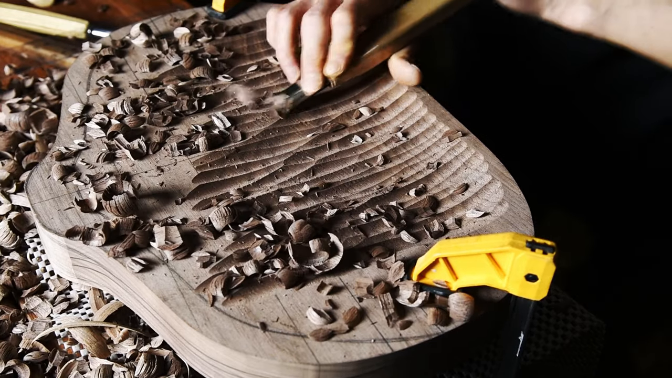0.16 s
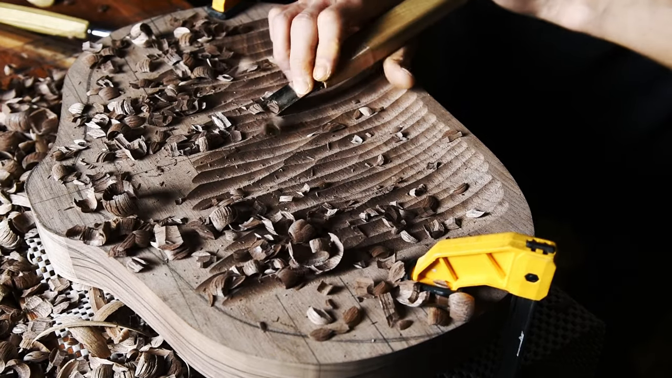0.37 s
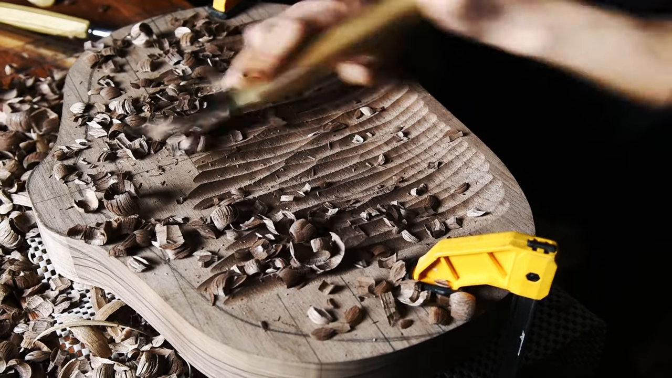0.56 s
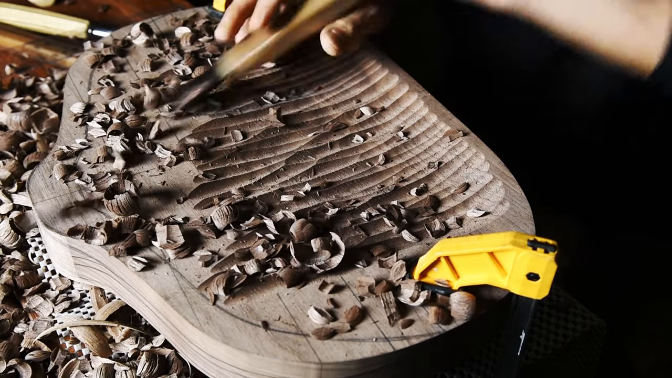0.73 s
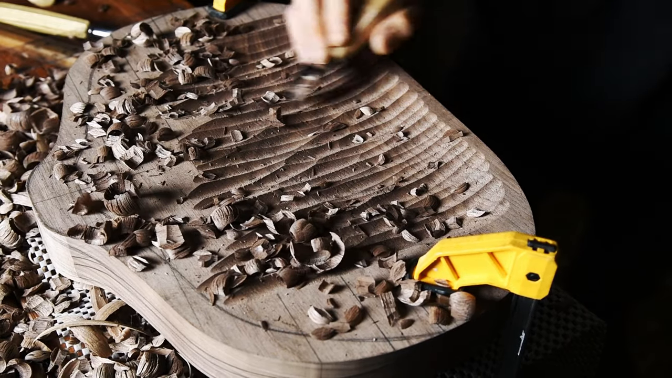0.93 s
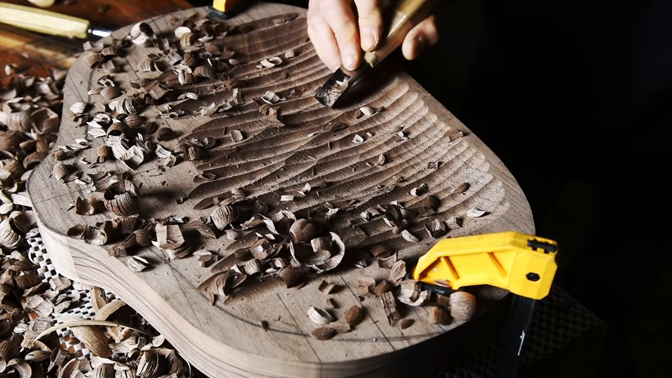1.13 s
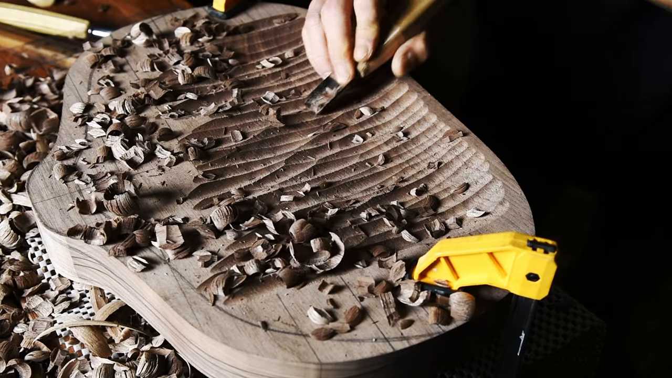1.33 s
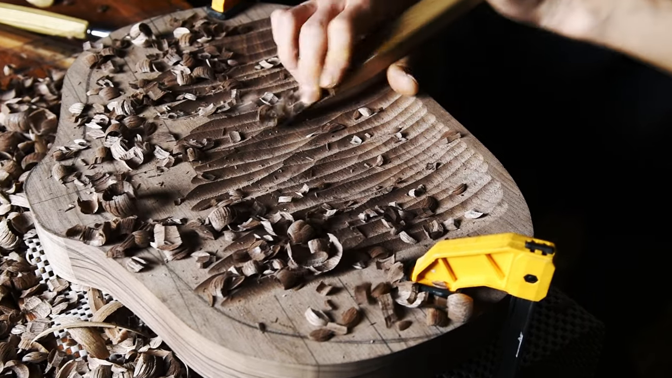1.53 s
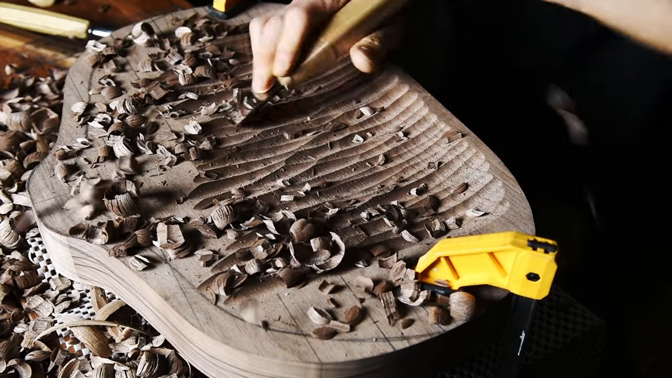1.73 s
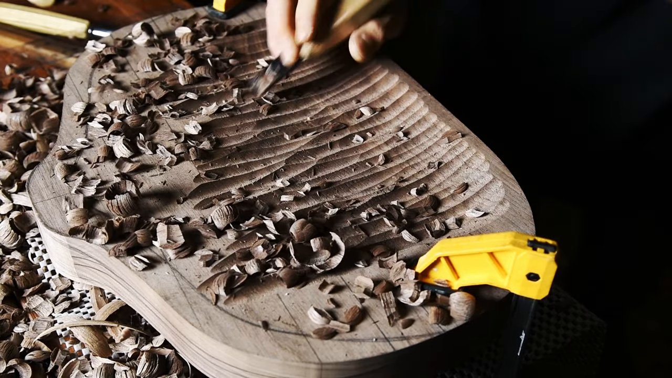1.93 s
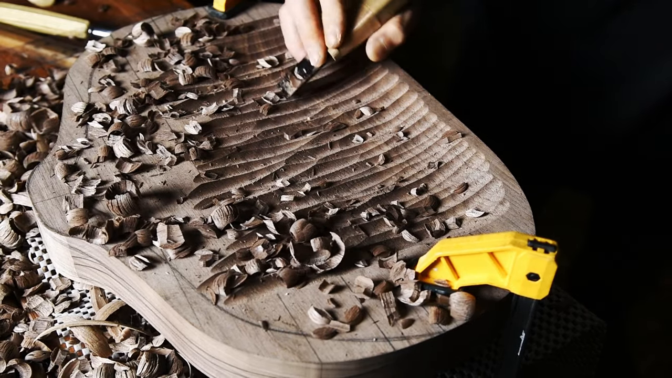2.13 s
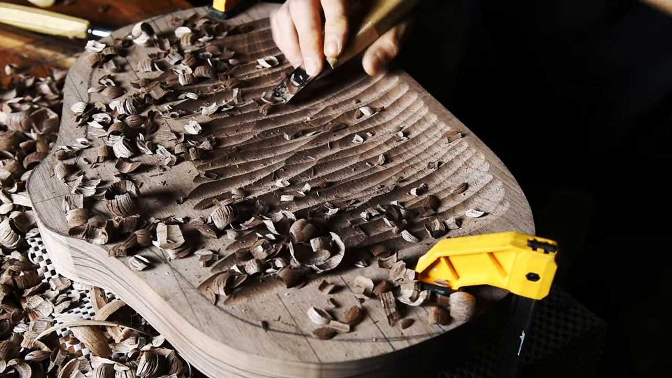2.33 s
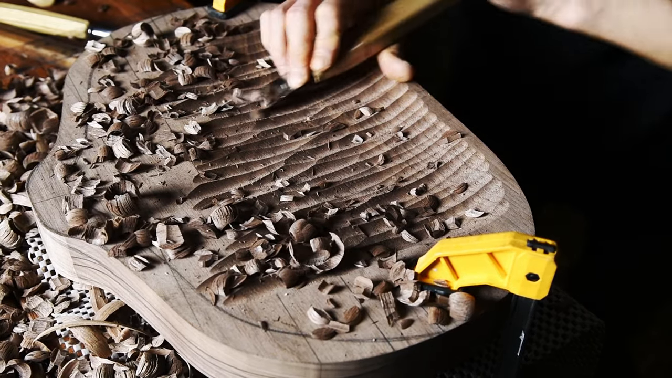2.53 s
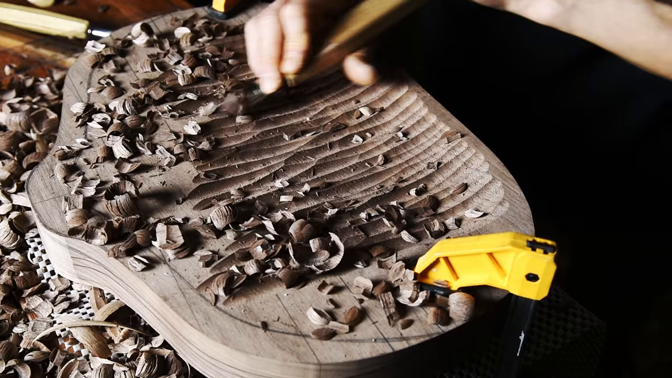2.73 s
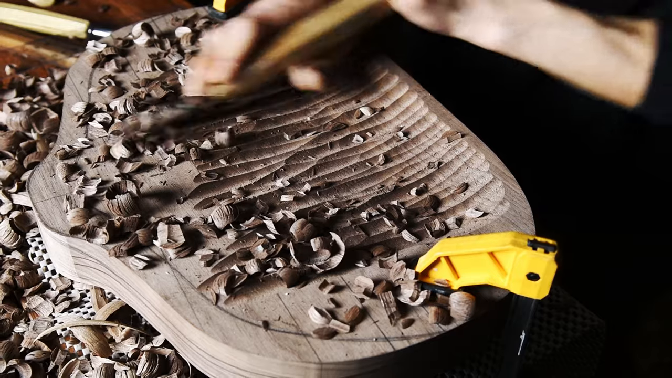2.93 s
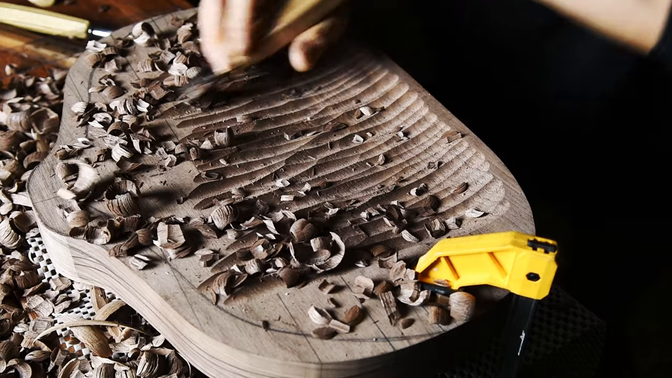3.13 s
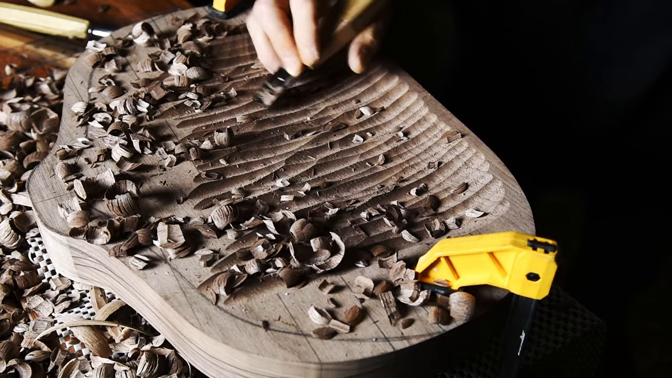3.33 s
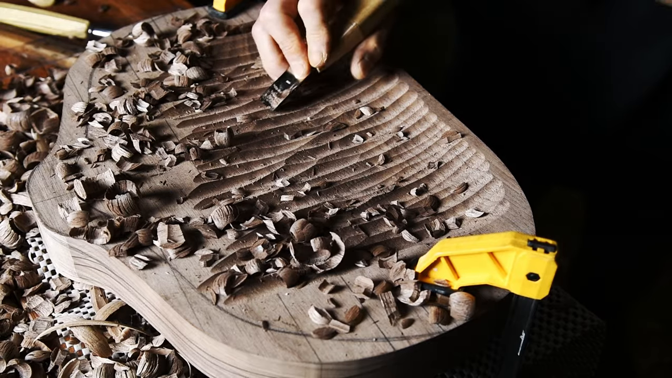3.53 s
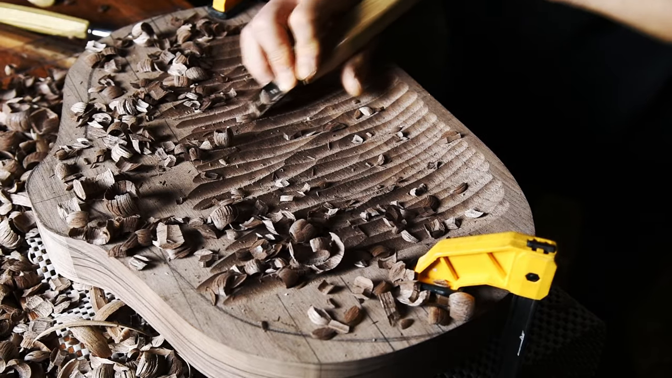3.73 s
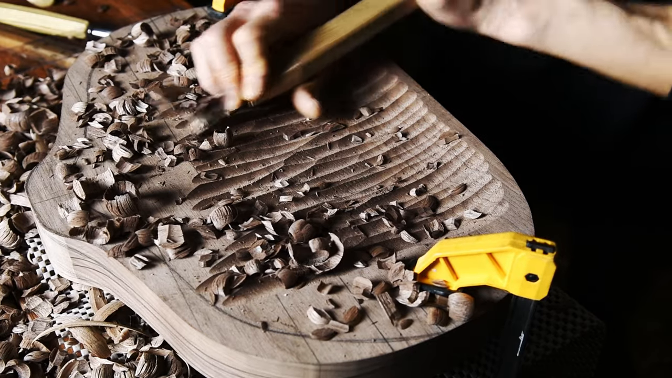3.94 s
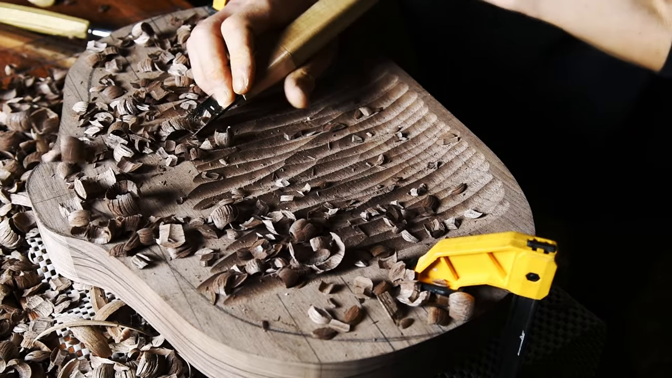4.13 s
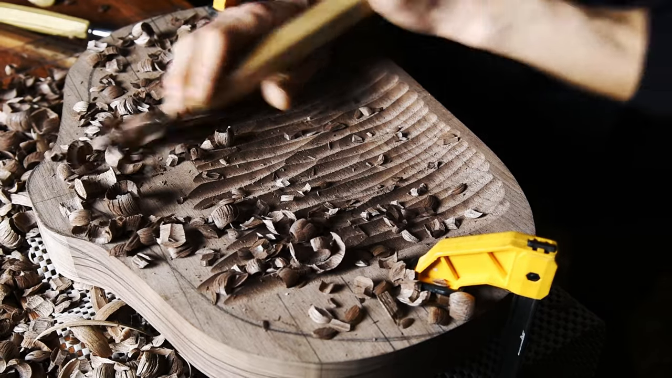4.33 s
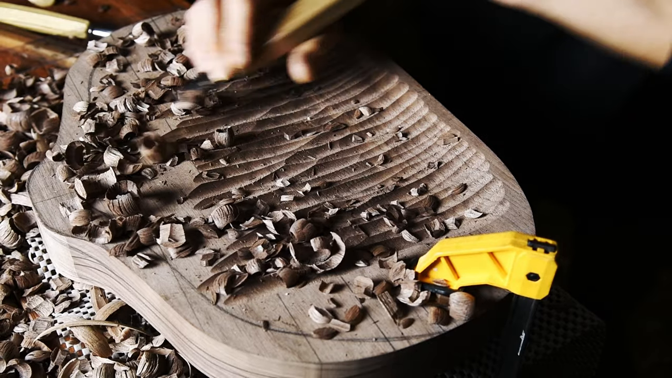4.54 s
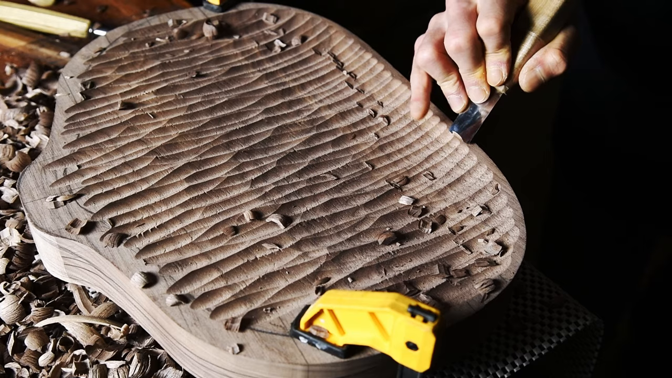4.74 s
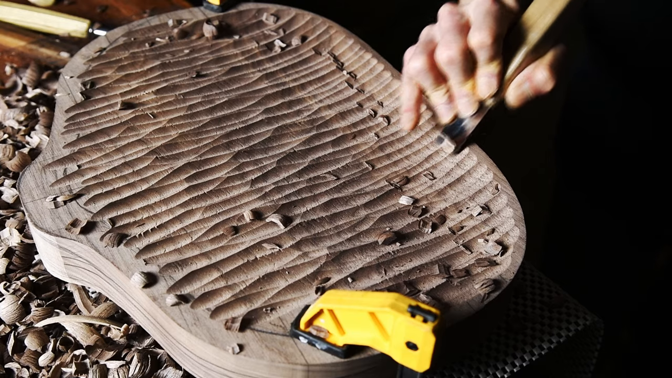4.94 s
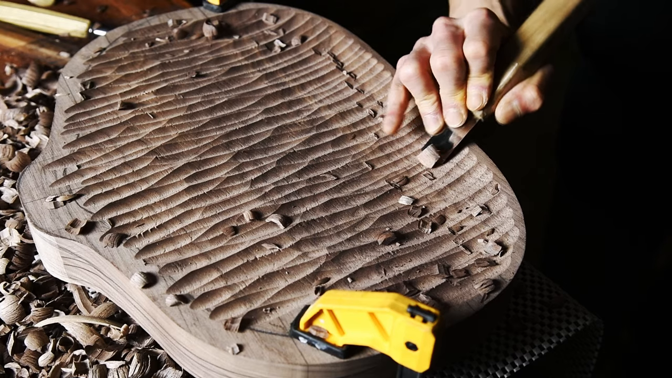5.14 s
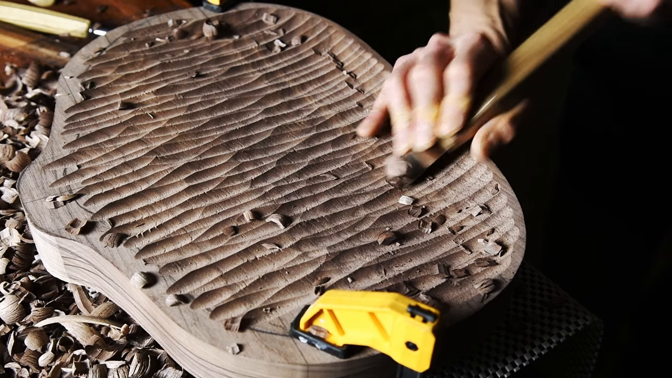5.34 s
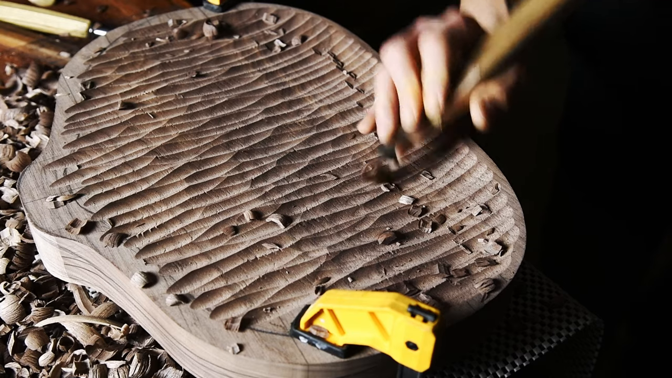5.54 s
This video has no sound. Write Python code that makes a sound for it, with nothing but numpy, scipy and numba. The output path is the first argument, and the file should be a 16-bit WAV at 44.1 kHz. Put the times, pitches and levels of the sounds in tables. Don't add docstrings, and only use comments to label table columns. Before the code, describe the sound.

A narrow gouge cuts hardwood close to the microphone in a small workshop over very quiet, low air. A gritty, crackling cut is already under way at 0 s and stops by 0.33; a short, loud jab cracks at about 0.5. Chips tick and the blade taps softly near 1.1. A long scrape creeps in at 1.2, grows coarse and peaks near 1.6, with chips scattering after. Another enters at 2.26, tearing deeper with slab and handle knocks until 2.95. Light taps fall at 3.3. The third long stroke rises from faint rasp at 3.5 to dense cracking at 3.9; a quick breakout snaps at 4.25-4.35 with a woody note. A barely audible hand slide at 4.6-4.8 leads to two rim strokes, about 4.8-5.2 and 5.2-5.4, with lower, drier, hollow knocks. A half-second tail fades into quiet, with one tiny tick near 5.7.

```python
import sys
import numpy as np
from scipy import signal
from scipy.fft import rfft, irfft
from scipy.io import wavfile
from scipy.ndimage import uniform_filter1d
from numba import njit

SR = 44100
rng = np.random.default_rng(int(sys.argv[2]) if len(sys.argv) > 2 else 0)


def generate_wav(sig):
    pcm = np.round(np.clip(np.atleast_2d(sig).T, -1, 1) * 32767).astype(np.int16)
    wavfile.write(sys.argv[1], SR, pcm)


def elevation(decibels):
    levels = np.asarray(decibels, float)
    return 10 ** (levels / 20)


N = 250488

# start_s, push_db, blade_freedom_db, lean_re_push_db
EARLY_STROKES = [
    [(0, -32, 7, -11.5), (0.1, -42.5, -2.5, 4.5), (0.2, -39.5, 1, 5), (0.27, -48, 0.5, -8),
     (0.33, -55, -23, -12)],
    [(0.47, -54, 3, -2), (0.5, -39.5, -8.5, -2.5), (0.525, -16.5, 3, -14), (0.55, -64, -2, 2.5),
     (0.62, -58, 13, -6), (0.8, -108, 3.5, -10)],
    [(1.17, -74.5, 10.5, -16.5), (1.21, -58.5, 5, -22.5), (1.3, -50.5, 1, -2), (1.44, -44, 6.5, 6),
     (1.52, -39.5, 3.5, 15), (1.62, -34.5, 4.5, -8), (1.66, -52.5, 0, 8.5), (1.92, -76.5, 23, -24)],
    [(2.26, -72, 11, -2), (2.42, -54.5, 8, 5.5), (2.56, -50, 0.5, 17.5), (2.61, -48.5, -4, 9.5),
     (2.72, -34, -5.5, -5), (2.81, -34.5, -6, -5), (2.92, -31.5, -15.5, -4), (2.96, -72, 5, 28)],
]
LATE_STROKES = [
    [(3.49, -81, 5, -14), (3.52, -70, 9, -9), (3.65, -57, 4.5, 7.5), (3.8, -36.5, -1.5, -1.5),
     (3.88, -32, 2, -1.5), (3.93, -28.5, -9.5, 0), (3.99, -44, -6.5, 2.5)],
    [(4.24, -40.5, -18, -13), (4.27, -27, -16, -2.5), (4.33, -38, -14, 1.5), (4.37, -63, 5, 6)],
    [(4.82, -57.5, 8, 5), (4.86, -50, 11, 0.5), (4.89, -50.5, 2, -5), (4.96, -31, -5, -6),
     (5.01, -46.5, 0.5, -11), (5.2, -51, -7, -6)],
    [(5.21, -39.5, -4, -2), (5.26, -35, -6, 1), (5.31, -30.5, -10.5, -4.5), (5.37, -39.5, -9, -5),
     (5.4, -44, -9, -44)],
]
STROKES = [*EARLY_STROKES, *LATE_STROKES]
PUSH, FREEDOM, LEAN = 1, 2, 3

# start_s, length_ms, strength_db
SLIPS_1 = [(0.0075, 2.3, -34), (0.038, 3, -26.5), (0.0535, 0.44, -28), (0.0921, 1.06, -23),
           (0.1203, 1.3, -17.5), (0.136, 3, -28.5), (0.151, 2.4, -24), (0.1625, 9.5, -42.5),
           (0.187, 0.86, -34), (0.208, 3.6, -24.5), (0.2464, 2.3, -24), (0.2882, 0.79, -31.5)]
SLIPS_2 = [
    (0.5012, 1.17, -18),
    (0.5166, 12, -31),
    (0.5287, 9.9, -38),
    (0.539, 4.6, -31.5),
]
SLIPS_3 = [(1.197, 1.8, -57), (1.2142, 2, -52), (1.23, 8.5, -49.5), (1.241, 4.6, -56), (1.268, 2.5, -46),
           (1.287, 6, -41), (1.3236, 3.3, -38), (1.3449, 4.3, -40.5), (1.3632, 0.74, -37),
           (1.387, 3.7, -33), (1.426, 2.6, -29.5), (1.441, 4.5, -32.5), (1.4651, 8.7, -29),
           (1.4755, 2.3, -27), (1.4862, 3.2, -28), (1.5037, 1.3, -25), (1.521, 0.1, -18), (1.5458, 4, -29),
           (1.57, 0.29, -16), (1.577, 7.4, -28.5), (1.599, 0.61, -24), (1.6102, 2, -36), (1.6187, 3, -31)]
SLIPS_4_ENTRY = [(2.2708, 1.3, -56.5), (2.292, 7.3, -52.5), (2.328, 5.5, -53), (2.3564, 3.7, -49),
                 (2.3745, 4.2, -46.5), (2.394, 3.2, -44.5), (2.4005, 1.6, -38.5), (2.4387, 3.3, -39),
                 (2.4624, 3.5, -43.5), (2.483, 6.5, -41.5), (2.4954, 1.6, -36.5), (2.514, 7.9, -35),
                 (2.5394, 4.1, -33.5), (2.5541, 6.5, -35.5), (2.5757, 3.7, -47.5)]
SLIPS_4_DEEP = [(2.63, 3.4, -33.5), (2.65, 0.99, -28), (2.6568, 2.5, -33.5), (2.672, 1.8, -32),
                (2.685, 6.7, -34), (2.708, 2.2, -34), (2.7172, 0.81, -27.5), (2.73, 1.3, -30),
                (2.748, 3.9, -33.5), (2.7766, 0.32, -18.5), (2.792, 1.6, -32.5), (2.823, 2.1, -28.5),
                (2.8321, 4.4, -31), (2.85, 1.5, -38), (2.8676, 3.7, -28), (2.8883, 5.9, -29.5),
                (2.9046, 4.3, -42.5), (2.919, 5.3, -35.5)]
SLIPS_5 = [(3.51, 8.5, -62), (3.544, 0.92, -43.5), (3.5527, 8.5, -55), (3.577, 3, -50.5), (3.6, 3.9, -46),
           (3.628, 5.7, -46), (3.65, 0.85, -32.5), (3.6747, 12, -44.5), (3.692, 1.8, -36),
           (3.7162, 3.4, -33), (3.7356, 0.95, -28), (3.7445, 2.5, -36), (3.755, 2.7, -36.5),
           (3.782, 0.73, -25.5), (3.7909, 0.82, -31), (3.808, 2.1, -31), (3.8184, 0.6, -25.5),
           (3.8243, 1.3, -27), (3.8355, 1.3, -24.5), (3.8489, 2.8, -27.5), (3.865, 1.6, -26.5),
           (3.8788, 0.15, -21.5), (3.886, 0.64, -25), (3.895, 1.4, -29), (3.9139, 0.11, -19),
           (3.9264, 0.65, -19.5), (3.932, 1.5, -25), (3.947, 1, -29.5), (3.963, 0.87, -29.5),
           (3.9819, 0.44, -26.5)]
SLIPS_6 = [
    (4.2472, 0.35, -34.5),
    (4.2606, 1, -29),
    (4.2768, 0.56, -22),
    (4.295, 1.14, -23.5),
    (4.3078, 13, -30.5),
]
SLIPS_RIM = [(4.831, 2, -50), (4.8426, 2.9, -39.5), (4.893, 11, -38.5), (4.919, 6.7, -43),
             (4.933, 2.8, -35), (4.951, 0.92, -53), (4.9697, 5.1, -42.5), (4.9863, 1.7, -37),
             (5.0149, 2.6, -37), (5.038, 2.9, -39), (5.2157, 1.3, -41), (5.231, 1.9, -47),
             (5.244, 1.2, -43), (5.377, 1.8, -46.5), (5.2668, 2.1, -50), (5.277, 23, -46),
             (5.3075, 11.7, -46)]
# start_s, length_ms,
# fine_crack_db, coarse_crack_db, blade_ring_db
CHIPS = [(0.487, 0.5, -39, -52.5, -47), (0.7387, 2.3, -54, -80.5, -72.5), (0.77, 4.3, -69, -76.5, -58.5),
         (0.8634, 0.4, -61.5, -61, -69), (0.8893, 0.54, -62.5, -61, -67), (1.139, 4.3, -82, -76, -68),
         (1.17, 2.5, -79.5, -72, -71.5), (2.251, 4, -87, -68, -81), (3.489, 2.7, -82, -74, -71),
         (4.732, 2.7, -79, -78, -74), (1.7677, 1.45, -30, -40.5, -57), (1.843, 3.3, -55, -62, -46),
         (1.885, 1.55, -82, -57, -64.5), (1.975, 0.55, -65, -75.5, -76), (1.9, 0.69, -53, -76, -43),
         (1.96, 3.4, -71, -79, -77), (2.1622, 0.2, -45, -89.5, -90.5), (2.1642, 0.16, -30.5, -88, -84.5),
         (2.171, 0.9, -50, -71, -88), (2.185, 12, -56, -73, -91), (2.203, 18, -59, -85, -95),
         (2.14, 13, -67, -88, -95), (2.579, 2.4, -40.5, -58.5, -63.5), (3.0197, 0.64, -47, -44, -64.5),
         (3.089, 1.63, -63, -51, -56), (3.098, 0.82, -64, -62, -69), (4.6596, 1.6, -85, -52.5, -35),
         (4.7446, 2.7, -54, -48.5, -43), (5.094, 2.6, -40.5, -39, -37.5), (5.147, 4.4, -43, -50, -53),
         (5.168, 1.5, -44, -51, -57), (5.6757, 2.1, -72, -87.5, -85.5)]
FINE, COARSE, RING = 2, 3, 4
FINE_PER_STRENGTH, FINE_PER_PUSH, FULL_BITE_DB, FINE_PER_LENGTH_DB = 0.15, 0.85, -48, -1
RING_PER_STRENGTH, RING_PER_FREEDOM, RING_PER_LENGTH_DB, RING_DB = 0.29, 0.9, 3, -3

# centre_hz, width_hz, level_db
ENTRIES = [
    [(1585, 250, 2), (1920, 170, -6.5), (2500, 380, -1.5), (2940, 270, 2.5), (4000, 810, -2.5),
     (5030, 940, 0.5), (6540, 300, -12.5), (9150, 1000, -18.5), (11900, 1100, -15), (14600, 900, -12.5)],
    [(1910, 98, -3), (2750, 370, 4.5), (3520, 510, -1.5), (4480, 980, -1.5), (5980, 800, -10),
     (7600, 1500, -9.5), (12100, 1500, -17), (14500, 600, -14.5)],
    [(2757, 260, 8.5), (4300, 590, 3.5), (5750, 480, -4.5), (6500, 400, -9.5), (8500, 2000, -8),
     (12650, 1200, -17.5), (14240, 900, -14)],
    [(1790, 1100, -10.5), (2840, 770, 7.5), (3650, 870, -6), (4740, 2400, -4), (7260, 1500, -7.5)],
]
ENTRY_OF = [0, 0, 0, 1, 2, 2, 3, 3]
# centre_hz, width_hz, level_db
EARLY_EDGES = [
    [(1660, 160, -9), (2537, 190, -5.5), (2920, 150, 4.5), (3330, 74, 3.5), (3670, 200, -1.5),
     (4370, 300, -4), (5000, 360, -2), (6930, 600, -9.5)],
    [(1630, 400, -4.5), (2860, 500, -1), (3330, 180, 7.5), (4500, 350, 2), (5430, 140, -10),
     (7200, 1600, -11.5)],
    [(1690, 250, -25.5), (3040, 130, 2.5), (3410, 100, 4), (3776, 150, -6), (4430, 550, -5.5),
     (4860, 730, -3.5), (7070, 770, -4)],
    [(1543, 190, 5), (2520, 360, -2.5), (2784, 90, 2), (3390, 290, -0.5), (5150, 560, -1),
     (7200, 740, -8.5)],
]
LATE_EDGES = [
    [(1523, 220, -9.5), (2500, 220, -11), (2754, 250, -5), (3410, 250, -12), (4800, 590, -5),
     (5410, 600, -2.5), (7550, 1900, -10.5)],
    [(1616, 570, -36), (2412, 94, 0.5), (3380, 650, -3.5), (4820, 880, -0.5), (7200, 1000, -6.5)],
    [(1800, 230, -9), (2760, 360, 2.5), (3460, 310, 0), (4520, 740, -6), (6770, 750, 0.5),
     (10700, 1200, -9)],
    [(1730, 250, 0.5), (2300, 260, 1.5), (2720, 230, 7), (3510, 160, -22), (4530, 740, -5),
     (6260, 280, -24), (7850, 400, -0.5), (14800, 1300, -21)],
]
EDGE_DB = [-1, -1, -1, -1, -1, -1, 0, 0]
GIVE = [.15, .15, 0.16, 0.98, 1.36, .3, 0.32, 0.43]
STIFFEN_SHALLOW_PER_DB, STIFFEN_DEEP_PER_DB, WANDER_SHARE = 0.0038, 0.005, 0.017
# centre_hz, width_hz, level_db
TEARING = [(1570, 1600, -13.5), (3240, 1800, -16.5), (5320, 1700, -13.5), (6800, 1800, -14)]
SHAVING = [(7800, 5400, 2.5), (11600, 280, 8), (14300, 4400, 1.5)]
CHIP_SNAP = [(9600, 3200, 1), (11100, 1200, 1.5), (14500, 6000, -0.5)]

# start_s, ring_db
TAPS = [
    (1.0774, -63),
    (2.1994, -57.5),
    (3.2798, -55.5),
    (3.3707, -61.5),
]
# centre_hz, width_hz, level_db
BLADE = [(1115, 192, -8), (1286, 80, 2.5)]
RIM_BLADE = [(1180, 450, -5), (1344, 115, 5)]

# centre_hz, width_hz, level_db
SLAB = [(182, 28, 0), (262, 61, -1), (309, 100, -2.5), (457, 100, -5.5), (814, 230, -7.5)]
SLAB_NOTE = [(634, 64, 4.5), (774, 59, -6.5)]
RIM_THUD = [(442.5, 32, 0)]
RIM_NOTE = [(542, 190, 4), (596, 340, 4.5)]
BENCH = [(147, 160, 0)]
HANDLE_NOTE = [(1963, 160, 0)]
EXIT_NOTE = [(672, 73, 5.5), (764, 96, -6.5)]
# thud_db, slab_note_db, bench_re_lean_db, handle_note_re_push_db
PLACES = [
    (-3, 0.5, -17.5, -7),
    (1.5, -1.5, -28.5, -3.5),
    (2, -4, -12.5, 1.5),
    (-2, -7.5, -8, -8),
    (-2, -5, -6, -4),
    (-6, -3, -10, -18),
    (-4.5, 7.5, -16, -46),
    (-8.5, -4.5, -25.5, -17),
]
# centre_s, level_db
EXITS = [
    (2.914, -36),
    (4.316, -37),
]
EXIT_S = 0.029
NOTE_PER_FREEDOM, HANDLE_PER_FREEDOM = -0.022, -0.32

# start_s, peak_db, pitch_hz
RIM_KNOCKS = [(4.831, -28.5, 642), (4.847, -22, 602), (4.895, -20, 628), (4.917, -17, 605),
              (4.929, -16, 563), (4.948, -11, 595), (4.97, -20, 616), (4.987, -21.5, 509),
              (5.02, -25.5, 580), (5.034, -24, 649), (5.06, -35, 573), (5.144, -31.5, 610),
              (5.173, -31, 600), (5.215, -36, 600), (5.258, -32, 582), (5.275, -26.5, 612),
              (5.304, -29, 602)]
EXIT_KNOCKS = [(1.672, -31, 860), (1.704, -41, 694), (1.737, -38.5, 800), (1.758, -38, 757),
               (1.798, -42, 805), (2.901, -22, 638), (2.914, -41, 665), (2.959, -36, 636),
               (2.989, -38.5, 636), (4.263, -24, 648), (4.279, -33, 610), (4.311, -18, 660),
               (4.329, -23, 691), (4.349, -39, 654), (4.384, -43, 660), (4.398, -33.5, 672),
               (4.439, -38, 740), (4.493, -41.5, 650), (4.552, -47.5, 674)]
HANDLE_KNOCKS = [(2.7504, -27, 1910), (2.7758, -25.5, 2010), (2.8292, -27, 2020), (2.8701, -22, 1930),
                 (2.888, -30, 1940), (2.9289, -33, 1950), (4.2573, -33.5, 2000), (4.2623, -25, 1930),
                 (4.3097, -30, 1994)]

# centre_hz, width_hz, level_db
SQUEAK = [(9000, 50, 0)]
SHUFFLE = [(400, 250, 0), (2500, 1800, -3), (5500, 4000, -11)]
# first_s, second_s (the squeak's are reversed, so it stays silent)
SQUEAK_S = (3.49, 3.2)
SHUFFLE_S = (4.6, 4.83)
SQUEAK_DB, SHUFFLE_DB = -83.5, -69

# centre_hz, t60_s, level_db
ROOM = [(102.7, 0.54, 2.5), (496, 0.49, 9), (1470, 0.56, -6), (3570, 0.5, 3.5), (10400, 0.35, -1),
        (14000, 0.26, -5.5)]
# centre_hz, width_hz, level_db
RIM_UNHEARD = [(1290, 250, -3)]
ROOM_DB, RIM_ROOM_DB, RIM_FROM_S = -10.5, -2, 4.62
# freq_hz, density_db_per_hz
AIR = [(18, -57.5), (30, -22.5), (194, -8.5), (632, -13), (889, -7), (1070, -14), (5740, -33),
       (11100, -32.5), (16000, -38.5)]
AIR_DB = -71.5


def cutting():
    shear = stroke()
    push_db = control(PUSH, np.arange(N) / SR).clip(-70, -30)
    depth = shear / (shear + elevation(-45.5))
    cut = slips()[:-len(CHIPS)]

    fine_drive = elevation(2.5) * jerks(FINE, rise=0.4, stretch=1.3, rows=cut) + elevation(-9.5) * shear
    fine = coloured(SHAVING, np.abs(depth) ** 0.66 * fine_drive, spread_db=4.0)
    snap_drive = jerks(FINE, rise=0.22, stretch=0.89, rows=CHIPS)
    snaps = coloured(CHIP_SNAP, snap_drive, spread_db=1.5, order=2)
    highpass = signal.butter(5, 7800, "high", fs=SR, output="sos")
    bright = signal.sosfilt(highpass, groove_echo(fine) + snaps)

    force = elevation(2.5) * jerks(COARSE, rise=0.46, stretch=1.63)
    force = force + elevation(-4.0) * shear * (0.47 + 0.6 * depth)
    shallow = edge([ENTRIES[k] for k in ENTRY_OF], elevation(0.5) * (1 - depth) * force,
                   STIFFEN_SHALLOW_PER_DB * (push_db + 58.5), tearing_db=-4, spread_db=2.0)
    deep = edge(EARLY_EDGES + LATE_EDGES, depth * force,
                STIFFEN_DEEP_PER_DB * (push_db + 35.5), tearing_db=2.5, spread_db=2.5)
    return bright + shallow + deep


def edge(tables, envelope, climb, tearing_db, spread_db):
    out, grains = np.zeros(N), fibres(spread_db)
    slip = np.searchsorted(np.sort(slips()[:, 0]), np.arange(N) / SR + 0.002)
    stray = WANDER_SHARE * rng.standard_normal((400, 10)).clip(-2, 2)
    starts = [0] + [int(s[0][0] * SR) - 2000 for s in STROKES[1:6]]
    starts += [int(RIM_FROM_S * SR), int(STROKES[7][0][0] * SR), N]
    for modes, db, give, a, b in zip(tables, EDGE_DB, GIVE, starts, starts[1:]):
        end = min(N, b + 2000)
        drive = np.pad(grains[a:b] * envelope[a:b], (0, end - b)) + 1e-18
        sound = elevation(tearing_db) * resonate(drive, TEARING, order=2)
        for k, (hz, width, level_db) in enumerate(modes):
            moving_hz = hz * (1 + give * climb[a:end] + stray[slip[a:end], k])
            sound = sound + (-1) ** k * elevation(level_db) * sliding(drive, moving_hz, float(width))
        steady = resonate(grains[:8000], modes, order=2)
        steady = steady + elevation(tearing_db) * resonate(grains[:8000], TEARING, order=2)
        out[a:end] += elevation(db) * sound / np.std(steady)
    return out


def slips():
    tables = [SLIPS_1, SLIPS_2, SLIPS_3, SLIPS_4_ENTRY, SLIPS_4_DEEP, SLIPS_5, SLIPS_6, SLIPS_RIM]
    s, ms, db = np.concatenate(tables).T
    shallow_db = np.minimum(control(PUSH, s) - FULL_BITE_DB, 0)
    fine = db + FINE_PER_STRENGTH * (db + 29.5) + FINE_PER_PUSH * shallow_db
    fine = fine + FINE_PER_LENGTH_DB * np.log2(ms)
    ring = db + RING_PER_STRENGTH * (db + 26) + RING_DB
    ring = ring + RING_PER_FREEDOM * control(FREEDOM, s) + RING_PER_LENGTH_DB * np.log2(ms)
    return np.concatenate([np.array([s, ms, fine, db, ring]).T, CHIPS])


def jerks(column, rise, stretch, rows=None):
    out, t_ms = np.zeros(N + 2048), np.arange(2048) / SR * 1000
    for row in slips() if rows is None else rows:
        attack = (1 - np.exp(-t_ms / (0.12 + rise * row[1]))) ** 2
        shape = attack * np.exp(-(t_ms / (0.43 + stretch * row[1])) ** 1.075)
        start = int((row[0] - 0.00064 * row[1]) * SR)
        out[start:start + 2048] += elevation(row[column]) * shape / shape.max()
    return out[:N]


def stroke(freedom=0, lean=0, place_db=0):
    t = np.arange(N) / SR
    which = np.searchsorted([s[0][0] for s in STROKES], t, side="right").clip(1) - 1
    cutting_now = t <= np.array([s[-1][0] for s in STROKES])[which]
    db = control(PUSH, t) + freedom * control(FREEDOM, t) + lean * control(LEAN, t)
    db = db + (place_db + np.zeros(len(STROKES)))[which]
    return uniform_filter1d(cutting_now * elevation(db), size=400)


def control(column, t):
    rows = np.concatenate(STROKES)
    return np.interp(t, rows[:, 0], rows[:, column])


def groove_echo(x):
    t = np.arange(N) / SR
    wander = np.clip(rng.standard_normal(40), -2, 2)
    lag_ms = 0.3 + 0.09 * np.interp(t, np.arange(40) / 7, wander)
    return x + 0.25 * np.interp(t - lag_ms / 1000, t, x)


def blade(at_rim):
    kicks = np.zeros(N)
    blows = np.array([(s, db) for s, *_, db in slips()] + list(TAPS))
    signs = np.sign(rng.standard_normal(len(blows)))
    kicks[(blows[:, 0] * SR).astype(int)] = elevation(blows[:, 1]) * signs
    ring = resonate(resonate(kicks, BLADE), [(1223, 300, 43.8)], order=2)
    knock = resonate(kicks, [(440, 370, 24.0)], order=2)
    rattle = elevation(-6.5) * jerks(RING, rise=0.21, stretch=1.6) + elevation(-1.0) * stroke(freedom=0.83)
    slab_rattle = coloured(BLADE, ~at_rim * rattle, spread_db=1.5)
    rim_rattle = coloured(RIM_BLADE, elevation(-2) * at_rim * rattle, spread_db=2.0)
    return ring + knock + slab_rattle + rim_rattle


def slab(at_rim):
    force = jerks(COARSE, rise=0.6, stretch=2.2) + 1e-5
    surge = (force / uniform_filter1d(force, size=3000)) ** 0.26
    thud_db, note_db, bench_db, handle_db = np.array(PLACES).T

    lean = surge * stroke(lean=0.74, place_db=thud_db)
    thud = coloured(SLAB, ~at_rim * lean, spread_db=2.5, order=2)
    thud = thud + coloured(RIM_THUD, at_rim * lean, spread_db=-8.0, order=2)

    slow_lean = uniform_filter1d(stroke(lean=0.69, place_db=bench_db), size=5000, origin=1200)
    bench = coloured(BENCH, slow_lean, spread_db=0.5, order=2)

    push = surge * stroke(NOTE_PER_FREEDOM, lean=0.86, place_db=note_db)
    note = coloured(SLAB_NOTE, ~at_rim * push, spread_db=2.5)
    note = note + coloured(RIM_NOTE, at_rim * push, spread_db=-4.0, order=2)

    t = np.arange(N) / SR
    exits = sum(elevation(db) * np.exp(-((t - s) / EXIT_S) ** 2) for s, db in EXITS)
    breakout = coloured(EXIT_NOTE, surge * exits, spread_db=-4.5, order=2)

    grip = surge * stroke(HANDLE_PER_FREEDOM, place_db=handle_db)
    handle = coloured(HANDLE_NOTE, grip, spread_db=1.0, order=2)
    return thud + bench + note + breakout + handle


def knocks(rows, swell_ms, fade_ms, db):
    out, t = np.zeros(N + 4096), np.arange(4096) / SR
    shape = (1 - np.exp(-t * 1000 / swell_ms)) ** 2 * np.exp(-t * 1000 / fade_ms)
    shape = shape / shape.max()
    for s, peak_db, hz in rows:
        start = int(s * SR)
        out[start:start + 4096] += elevation(peak_db + db) * shape * np.sin(2 * np.pi * hz * t)
    return out[:N]


def rub(span_s, modes, db, spread_db):
    t = np.arange(N) / SR
    gate = uniform_filter1d(1.0 * (t > span_s[0]) * (t < span_s[1]), size=600)
    return coloured(modes, elevation(db) * gate, spread_db, order=2)


def room(x, at_rim):
    t, tail = np.arange(SR) / SR, 0
    for hz, t60_s, db in ROOM:
        band = unit(resonate(rng.standard_normal(SR), [(hz, 0.76 * hz, 0)]))
        tail = tail + band * elevation(db - 60 * t / t60_s) * np.sqrt(hz)
    tail = tail * np.clip((t - 0.006) / 0.0055, 0, 1)
    tail = elevation(ROOM_DB) * tail / np.sqrt(np.sum(tail ** 2))
    slab_tail = signal.fftconvolve(~at_rim * x, tail)[:N]
    rim_tail = signal.fftconvolve(at_rim * (x - resonate(x, RIM_UNHEARD)), tail)[:N]
    fade = uniform_filter1d(1.0 * ~at_rim, size=6000)
    return fade * slab_tail + elevation(RIM_ROOM_DB) * rim_tail


def air():
    log_hz = np.log(np.arange(N // 2 + 1) * SR / N + 1)
    air_hz, air_db = np.array(AIR).T
    colour = elevation(np.interp(log_hz, np.log(air_hz), air_db))
    return elevation(AIR_DB) * unit(irfft(rfft(rng.standard_normal(N)) * colour, N))


def unit(x):
    return x / np.sqrt(np.mean(x ** 2))


def fibres(spread_db):
    sizes = rng.exponential(size=N).clip(max=5.5)
    return unit(rng.standard_normal(N) * elevation(spread_db * sizes))


def resonate(x, modes, order=1):
    out = 0
    for k, (hz, width, db) in enumerate(modes):
        peak = np.concatenate(signal.iirpeak(hz, hz / width, fs=SR))
        out = out + (-1) ** k * elevation(db) * signal.sosfilt(np.tile(peak, (order, 1)), x)
    return out


def coloured(modes, envelope, spread_db, order=1):
    grains = fibres(spread_db)
    steady = resonate(grains[:SR // 3], modes, order)
    return resonate(grains * envelope, modes, order) / np.std(steady)


@njit
def sliding(x, hz, width):
    y = np.empty(len(x))
    band1, low1, band2, low2, g, k, r = 0., 0., 0., 0., 0., 0., 0.
    for i in range(len(x)):
        if i % 16 == 0:
            g, k = np.tan(np.pi * hz[i] / SR), width / hz[i]
            r = 1 / (1 + g * (g + k))
        v = (band1 + g * (x[i] - low1)) * r
        w = (band2 + g * (k * v - low2)) * r
        band1, low1 = 2 * v - band1, low1 + 2 * g * v
        band2, low2 = 2 * w - band2, low2 + 2 * g * w
        y[i] = k * w
    return y


def scene():
    at_rim = np.arange(N) / SR > RIM_FROM_S
    near = cutting() + blade(at_rim) + slab(at_rim)
    near = near + knocks(RIM_KNOCKS, swell_ms=1.7, fade_ms=7.2, db=-3.5)
    near = near + knocks(EXIT_KNOCKS, swell_ms=1.36, fade_ms=7.3, db=-3.5)
    near = near + knocks(HANDLE_KNOCKS, swell_ms=0.51, fade_ms=5.5, db=0)
    squeak = rub(SQUEAK_S, SQUEAK, SQUEAK_DB, spread_db=1.0)
    shuffle = rub(SHUFFLE_S, SHUFFLE, SHUFFLE_DB, spread_db=7.0)
    return (near + squeak + shuffle + room(near, at_rim) + air())[None]


def top_cut(x):
    return signal.sosfilt(signal.butter(12, 16990, fs=SR, output="sos"), x)


def record(dry):
    rounded = 0.4 * np.tanh(dry / 0.4)
    lowpass = signal.ellip(8, 0.2, 45, 15900, fs=SR, output="sos")
    mix = signal.sosfilt(lowpass, rounded)
    return top_cut(mix)


dry = scene()
out = record(dry)
generate_wav(out)
```